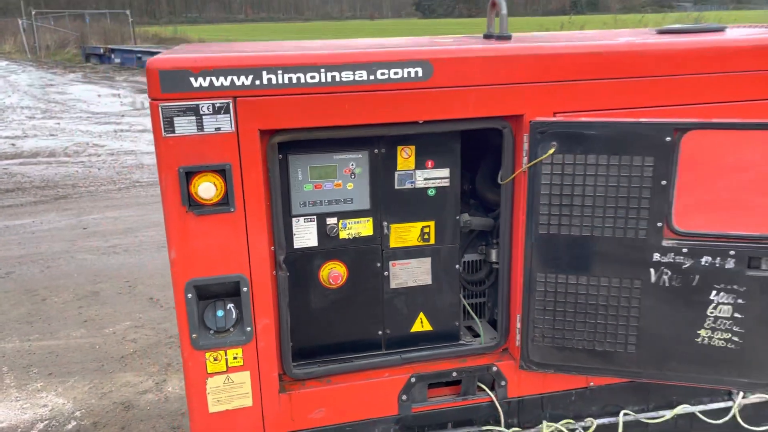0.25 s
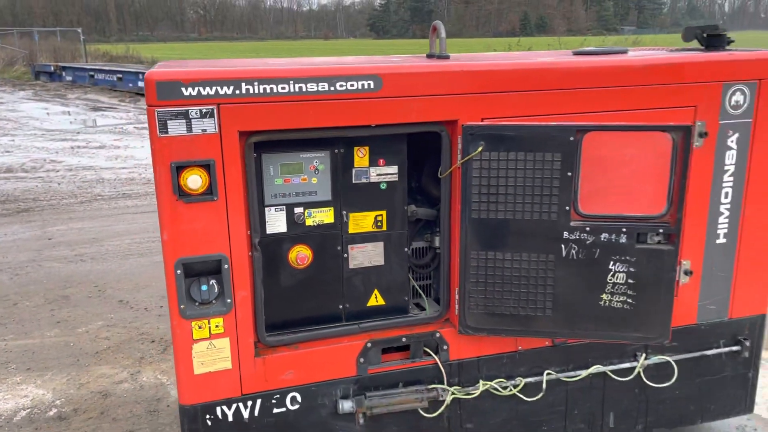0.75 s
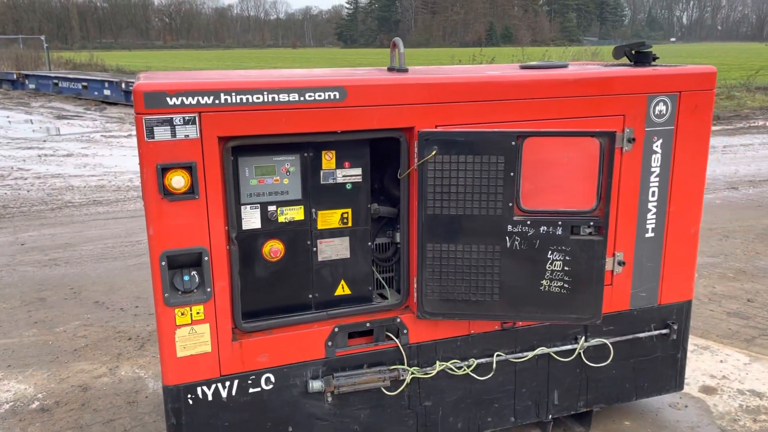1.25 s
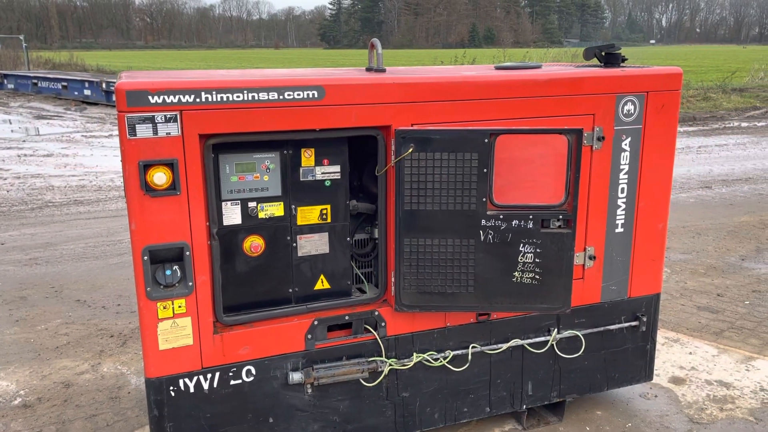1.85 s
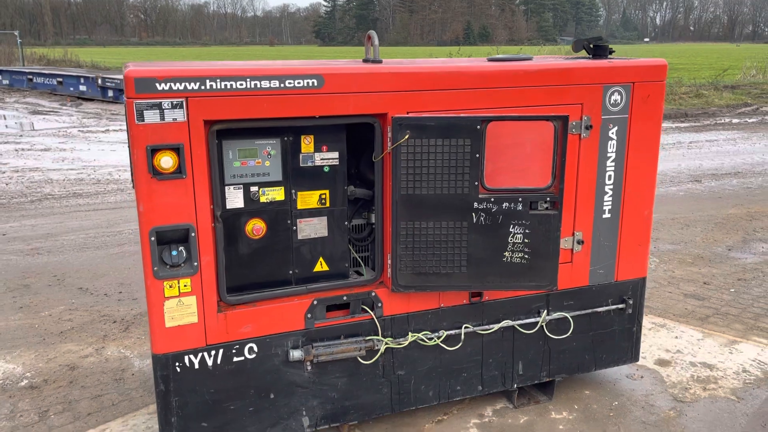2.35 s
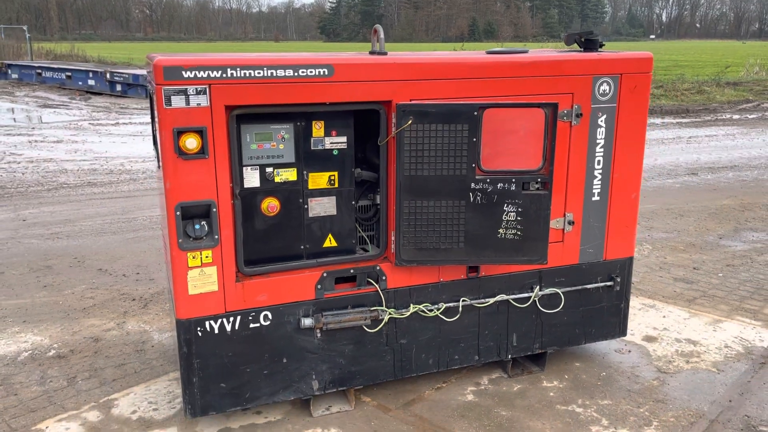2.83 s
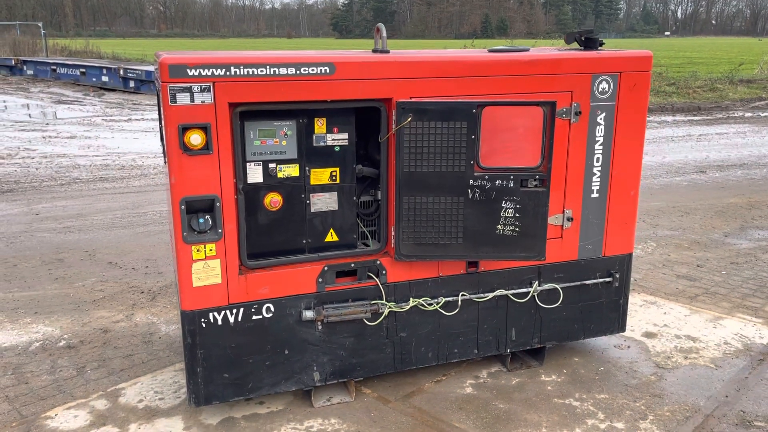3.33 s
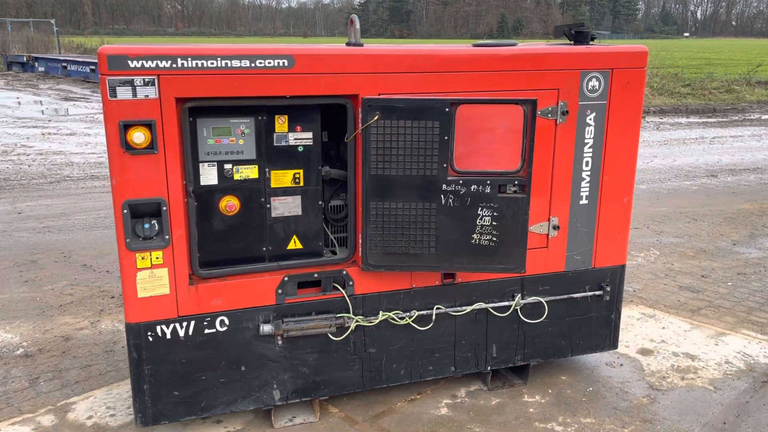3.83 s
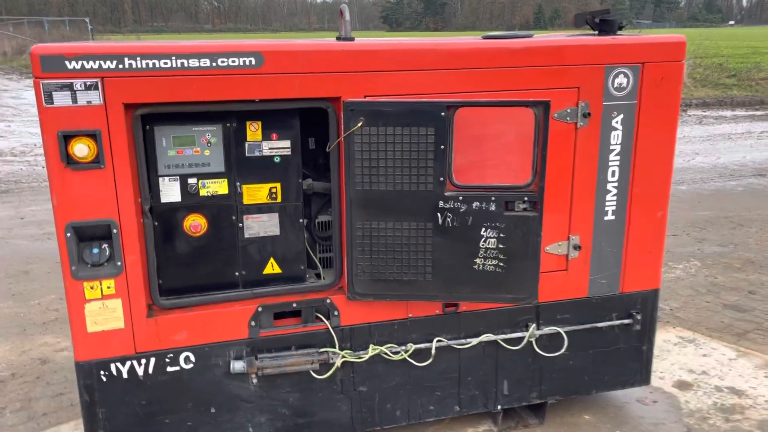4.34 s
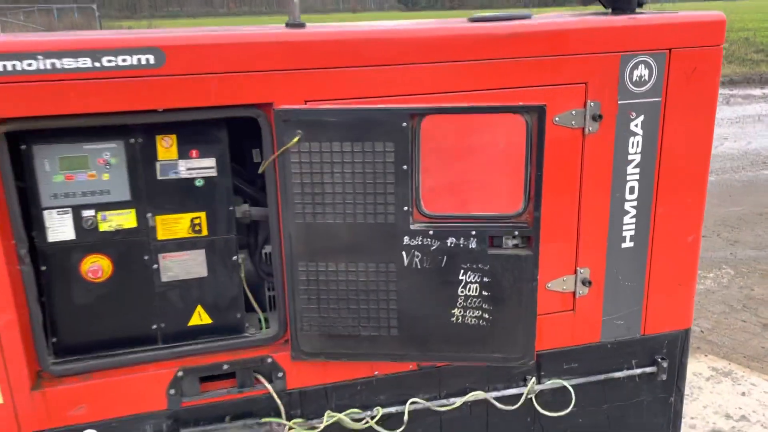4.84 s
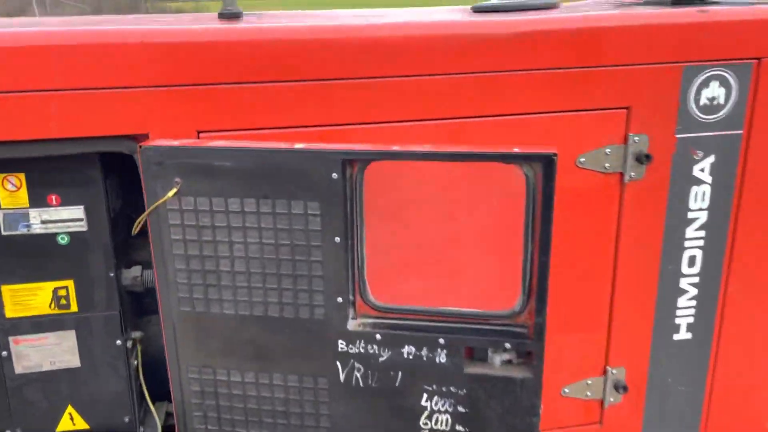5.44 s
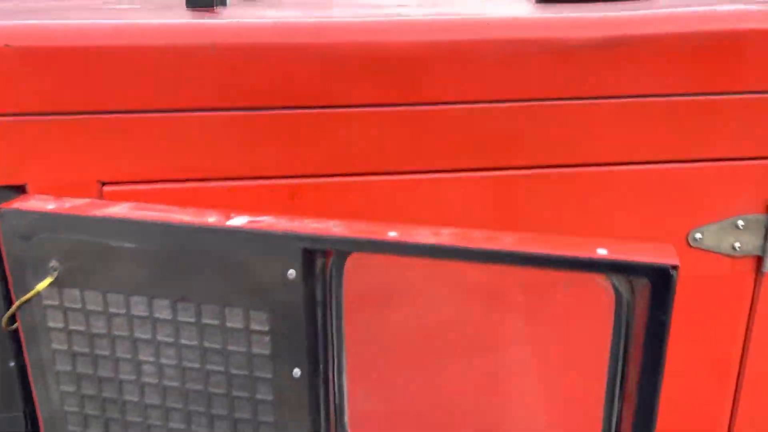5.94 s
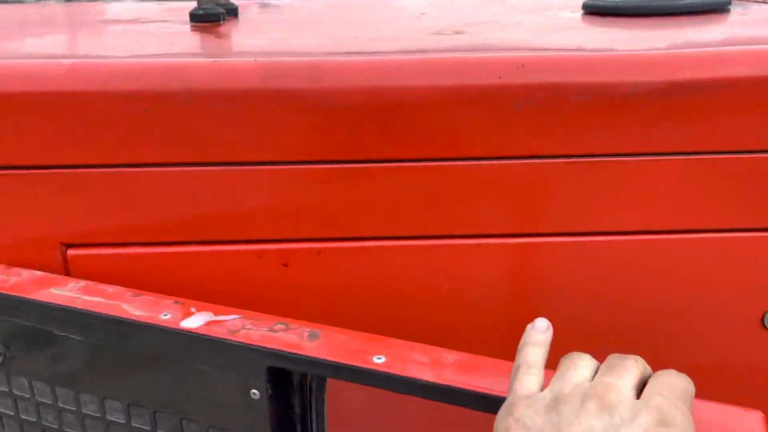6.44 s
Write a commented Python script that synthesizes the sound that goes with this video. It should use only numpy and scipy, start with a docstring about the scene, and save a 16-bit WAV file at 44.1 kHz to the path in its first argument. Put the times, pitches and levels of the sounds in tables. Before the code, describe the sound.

A diesel generator is running from the first instant, with no start or stop: a hard, dense metallic clatter at about 53 firings a second, with an uneven pattern repeating about 13 times a second. Ringing engine-block tones around 1.7 kHz dominate, over a low hum, canopy rumble, thin gear whine and hiss reaching about 10 kHz. From 0 to 2 seconds the knock and clatter surge about three times a second, slowing and fading into a steady run. Bass thins as the handheld stereo microphone backs away, staying leaner until about 4 seconds, with small wind puffs, clustered near 2.6. From 4.3 the microphone moves in: hum and drone grow, tone colour shifts and the image widens. Between 5.0 and 6.0 faint high injector pings tick regularly. Wind thumps around 4.3 to 5.4, then buffets hardest from 6.3 to the end, while the engine continues.

```python
"""Diesel generator in a windy yard

A four-cylinder diesel runs in its steel canopy; its speed hunts at first, then settles.
Engine-cycle tones, rung block modes, gated noise, panel rings and gear whine make the engine.
The listener backs away, then walks up close: bass grows, colour and stereo image turn.
Gusts of low noise buffet the two microphone ports."""
import sys
import numpy as np
from scipy import signal
from scipy.io import wavfile
from scipy.ndimage import uniform_filter1d

SR = 44100
rng = np.random.default_rng(int(sys.argv[2]) if len(sys.argv) > 2 else 0)


def materialize(psi):
    """Save the field psi as 16-bit PCM at rate SR to the path in sys.argv[1].

    A 1-D psi becomes a single channel; in a 2-D psi each row is a channel.
    """
    bounded = np.clip(np.atleast_2d(psi).T, -1, 1)
    quanta = np.round(bounded * 32767).astype(np.int16)
    wavfile.write(sys.argv[1], SR, quanta)


N = 294588
CYCLE_HZ = 13.325  # one four-stroke cycle: four firings
FRAME = 64  # samples per step of slow drift

# relative bass levels: start_s, hum_db, rumble_db
BASS = [(0, -22, -20.5), (.5, -19.5, -24), (.8, -27.5, -19.5), (1.12, -32.5, -32.5), (1.5, -33, -29),
        (1.88, -37, -33), (2.08, -21.5, -23), (2.25, -35, -28.5), (2.5, -26, -26), (2.85, -34, -35),
        (3.1, -33.5, -32.5), (3.46, -24, -27), (4.28, -18.5, -20), (4.65, -29, -23), (4.98, -24, -26.5),
        (5.22, -16.5, -17), (6.2, -17.5, -19), (6.68, -16, -14.5)]
# listener: start_s, closeness to canopy (0-1), lean over door (0-1), share of port phase (0-1)
WALK = [(0, 0, 0, 0.081), (.6, 0.08, 0.12, 0.53), (1.2, 0.14, 0.07, 1.0), (4.2, 0.04, 0, 1.0),
        (4.45, 0.16, 0.23, 1.0), (4.7, 0.59, 0, 1.0), (5.3, 0.67, 0.28, 1.0), (5.6, 0.7, 0.43, 1.0),
        (5.8, 0.77, 0.34, 1.0), (6.05, 0.74, 0.58, 0.98), (6.68, 0.71, 0.7, 0.99)]


def amp(db):
    """Decibels to amplitude."""
    return 10 ** (np.asarray(db) / 20)


def evened(x):
    """Scale to rms 1."""
    return x / np.sqrt(np.mean(x ** 2) + 1e-20)


def read(points, hz):
    """Spectrum table at frequencies hz, straight on a log axis."""
    f, value = np.transpose(points)
    return np.interp(np.log(hz + 1), np.log(f + 1), value)


def curves(rows, t):
    """Every column of a table at times t."""
    s, *columns = np.transpose(rows)
    return [np.interp(t, s, c) for c in columns]


def band(x, lo_hz, hi_hz):
    """Band-pass, rms 1."""
    sos = signal.butter(3, [lo_hz, hi_hz], "bandpass", fs=SR, output="sos")
    return evened(signal.sosfilt(sos, x))


def ring(x, hz, width_hz):
    """One mode of the engine block: a two-pole resonator."""
    r = np.exp(-np.pi * width_hz / SR)
    turn = 2 * np.pi * hz / SR
    return signal.lfilter([np.sin(turn)], [1, -2 * r * np.cos(turn), r * r], x)


def slow(count, span):
    """Rows of slowly drifting chance, jointly rms 1, one value a frame."""
    noise = rng.standard_normal((count, N // FRAME + 1))
    return evened(uniform_filter1d(uniform_filter1d(noise, span, axis=1), span, axis=1))


def at_times(row, t):
    """A slow row read at times t."""
    return np.interp(t * SR / FRAME, np.arange(N // FRAME + 1), row)


def tones(orders, cycle, waver_db, spread):
    """Wavering multiples of the engine cycle; a small phase spread bunches them into one throb a cycle."""
    cycle = cycle[::8]  # low enough for an eighth of the rate
    waver = amp(waver_db * slow(count=len(orders), span=40))
    waver = np.repeat(waver, 8, axis=1)[:, :len(cycle)]
    low = sum(amp(db) * w * np.cos(2 * np.pi * (k * cycle + spread * rng.random()))
              for (k, db), w in zip(orders, waver))
    return evened(signal.resample_poly(low, 8, 1)[:N])


def wind(t):
    """Lumps of turbulent low noise around each buffet's pitch, partly unlike in the two ports."""
    # buffets: start_s, relative level_db, pitch_hz, length_s
    gusts = [(0.19, -19.5, 250, 0.045), (0.488, -10, 388, 0.012), (0.328, -13, 114, 0.057),
             (0.735, -7, 128, 0.037), (1.036, -15, 384, 0.048), (1.499, -14, 334, 0.014),
             (2.209, -14, 390, 0.022), (2.519, -8.5, 280, 0.025), (2.548, -12.5, 420, 0.027),
             (2.606, -13, 537, 0.017), (2.636, -11.5, 480, 0.028), (2.72, -22, 282, 0.021),
             (2.964, -20, 290, 0.014), (3.136, -20, 280, 0.013), (3.434, -16, 282.7, 0.008),
             (4.24, -10, 117, 0.11), (4.308, -8.5, 238, 0.016), (4.583, -8.5, 179, 0.019),
             (4.805, -8.5, 357, 0.021), (5.203, -13.5, 265, 0.038), (5.227, -7.5, 258, 0.015),
             (5.329, -10.5, 300, 0.016), (5.441, -6.5, 115, 0.071), (6.238, -11, 364, 0.047),
             (6.358, 2, 113, 0.014), (6.394, -6.5, 245, 0.012), (6.482, -3.5, 111, 0.024),
             (6.55, -6, 222, 0.016), (6.589, -5.5, 290, 0.014), (6.651, -1.5, 365, 0.032)]
    out = np.zeros((2, N))
    for s, db, hz, length_s in gusts:
        at = slice(round((s - .05) * SR), round((s + .15) * SR))
        shared, own = (band(rng.standard_normal(8820), hz * 0.32, hz * 1.35) for _ in range(2))
        u = (t[at] - s) / length_s
        steepness = np.where(u < .3, 9.0, 1.8)  # rises faster than it falls
        shape = amp(db - 6.0) * np.exp(-steepness * (u - .3) ** 2)
        out[:, at] += shape * (shared + np.array([[.4], [-.4]]) * own)[:, :len(u)]
    flutter = np.array([band(rng.standard_normal(N), 60, 380) for _ in range(2)])
    flutter *= amp(5 * at_times(slow(count=1, span=14)[0], t))  # choppy
    return out + amp(curves(BASS, t)[1] - 14.0) * flutter


def hunt(t):
    """Governor hunting: fuel surges that slow down and die away."""
    # start_s, strength of the swing (ratio)
    surges = [(0, 1.13), (.19, 1.1), (.54, 0.73), (.9, 0.98), (1.3, 0.44), (1.7, .45), (2.1, 0.12), (3, 0)]
    surge_s, hunt_hz, sag_hz_per_s = .19, 2.9, .41
    u = t - surge_s
    swings = hunt_hz * u - .5 * sag_hz_per_s * np.minimum(u, 3) ** 2
    return curves(surges, t)[0] * np.cos(2 * np.pi * swings)


def load(t):
    """Drone, knock, clatter and hiss levels in dB, swinging with the governor."""
    # relative levels: start_s, drone_db, knock_db, clatter_db, hiss_db
    levels = [(0, -32, -30.5, -40, -44), (1, -31.5, -32, -40.5, -43.5), (2, -33.5, -31, -40.5, -43),
              (2.5, -34, -31, -40, -43), (2.88, -35.5, -30.5, -39.5, -43),
              (3.499, -31.5, -29.5, -40, -43.5), (4.3, -30, -30.5, -41, -41.5),
              (5, -27.5, -30.5, -37.5, -41.5), (5.7, -28.5, -30.5, -37, -39), (6.15, -29, -31, -41, -42.5),
              (6.68, -27.5, -31, -39.5, -39.5)]
    # swing at hunt strength 1: drone, knock, clatter, hiss [dB]
    hunt_db = [0.27, 4.9, 2.9, 3.2]
    return [db + swing_db * hunt(t) for db, swing_db in zip(curves(levels, t), hunt_db)]


def bass(t):
    """Hum and rumble levels in dB, with brief hum dips and random waver."""
    # hum dips: centre_s, depth_db, half_width_s
    dips = [(.35, -18, 0.023), (2.62, -9, 0.033), (4.39, -13, 0.089), (4.91, -26, 0.018), (6.43, -9, 0.11)]
    # rms random waver: hum, rumble [dB]
    waver_db = [.7, 1.0]
    hum_db, rumble_db = curves(BASS, t)
    hum_db = hum_db + sum(db * np.exp(-((t - s) / half_s) ** 2) for s, db, half_s in dips)
    rows = slow(count=2, span=30)
    return [db + w_db * at_times(row, t) for db, w_db, row in zip((hum_db, rumble_db), waver_db, rows)]


def firings(cycle):
    """Firing count, cylinder index, and seconds since it lit."""
    turn = 4 * cycle + 4.27
    count = np.floor(turn).astype(int)
    return count, (count - 1) % 4, turn % 1 / (4 * CYCLE_HZ)


def whine(t, cycle):
    """Timing gears: the tooth tone and its neighbours, as multiples of the cycle."""
    # cycle multiple, relative level_db
    orders = [(127, -1.5), (128, -0.5), (131, -3), (140, 0.5), (144, -8), (148, -5.5)]
    # start_s, relative level_db
    whine_levels = [(0.0, -61), (0.115, -51), (0.14, -25), (0.4, -49), (0.53, -29), (0.75, -40), (0.9, -30),
                    (1.1, -36.5), (1.34, -37), (1.4, -48), (2.68, -30), (3.36, -32), (3.46, -28.5),
                    (4.5, -36), (4.8, -45), (4.91, -37), (5.39, -43), (5.46, -38), (5.81, -44),
                    (5.84, -38.5), (6.6, -36.5)]
    return amp(curves(whine_levels, t)[0] - 1.0) * tones(orders, cycle, 2.0, 0.94)


def ping():
    """An injector rings briefly as the listener passes: damped tones, each with a dry noise snap."""
    # start_s, relative level_db, pitch_hz
    pings = [(5.0328, -39, 4600), (5.1066, -33, 4600), (5.1829, -29, 4380), (5.2567, -35, 4330),
             (5.3321, -30.5, 4360), (5.4067, -32, 4310), (5.48, -29, 4300), (5.5562, -43, 4140),
             (5.6304, -24, 4240), (5.7052, -32, 4240), (5.7801, -27, 4240), (5.8549, -31, 4260),
             (5.9312, -34, 4280), (6.0055, -48, 4200)]
    width_hz, snap_db, snap_s = 50, -6, 0.005
    out, u = np.zeros(N), np.arange(1500) / SR
    for (s, db, hz), noise in zip(pings, rng.standard_normal((len(pings), 1500))):
        swell = np.minimum(u / .002, 1)
        tone = swell * np.exp(-np.pi * width_hz * u) * np.sin(2 * np.pi * hz * u)
        snap = amp(snap_db) * np.exp(-u / snap_s) * band(noise, 2800, 6900)
        out[round(s * SR):][:1500] += amp(db + 1.5) * (tone + snap)
    return out


def panel(t, cycle):
    """Cylinder one's blow rings a canopy panel once a cycle, on a resonance that slides with the angle."""
    # start_s, pitch_hz, relative level_db
    resonance = [(0, 1033, -26.5), (1.2, 1120, -32.5), (2.5, 1046, -35), (4.2, 990, -33.5),
                 (4.5, 1103, -27.5), (4.9, 1050, -28), (5.3, 1027, -27), (5.8, 1045, -27.5),
                 (6.1, 1040, -35.5), (6.68, 1030, -29)]
    width_hz, lag_cycles = 60, 0.018
    count, cylinder, _ = firings(cycle - lag_cycles)
    hz, db = curves(resonance, t)
    lit = (np.diff(count, prepend=count[0]) > 0) * (cylinder == 0)
    tap = lit * amp(db + 3.4 * hunt(t) + 0.78 * rng.standard_normal(400)[count])
    turn, r = np.exp(2j * np.pi * np.cumsum(hz) / SR), np.exp(-np.pi * width_hz / SR)
    soft = signal.lfilter([.02], [1, -.98], tap / turn)  # swells for about a millisecond
    return (turn * signal.lfilter([1], [1, -r], soft)).real * 2.4  # the swell costs the peak


def clatter(t, cycle):
    """Valve and injector noise flaring at every firing over the fan's rush; its top puffs more evenly."""
    # below the split, per cylinder [dB]
    clatter_cyl_db = [-3, -2.5, -1.5, 5]
    # above the split, per cylinder [dB]
    hiss_cyl_db = [0, 0, 1.5, 0]
    # extra clatter in a surge of strength 1, per cylinder [dB]
    surge_cyl_db = [5.6, 7.9, 10, 2.8]
    split_hz = 5800
    count, cylinder, since = firings(cycle)
    chance = amp(2.4 * rng.standard_normal((2, 400)))[:, count]
    flare, puff = amp([clatter_cyl_db, hiss_cyl_db])[:, cylinder] * chance
    flare = flare * amp(np.array(surge_cyl_db)[cylinder] * np.maximum(hunt(t), 0))
    # much of the noise returns every cycle, changing slowly
    one, other = rng.standard_normal((2, 4, 900))[:, cylinder, (since * SR).astype(int)]
    rush = rng.standard_normal(N) + 1.1 * (one * np.cos(1.5 * t) + other * np.sin(1.5 * t))
    flare_shape = np.minimum(since / 0.0025, 1) * np.exp(-since / 0.011)
    puff_shape = np.minimum(since / 0.00078, 1) * np.exp(-since / 0.019)
    low = evened((0.95 + 0.79 * flare * flare_shape) * rush)
    top = evened((0.6 + 1.65 * puff * puff_shape) * rush)
    split = signal.butter(4, split_hz, fs=SR, output="sos")
    return top + signal.sosfiltfilt(split, low - top)


def coloured(x):
    """Filter by a broad colour that moves with the walk; its bands follow drone, knock, clatter and hiss."""
    # colour from afar: pitch_hz, relative density_db
    far = [(150, -53), (250, -4), (341, -17), (458, -16), (879, -4), (1060, 1), (1580, 6), (1710, -20),
           (1910, 5), (2300, -22.5), (2900, -18), (6810, -25), (8870, -14.5), (9740, -20.5), (10200, -33),
           (13300, -57), (22000, -120)]
    # colour up close: pitch_hz, relative density_db
    near = [(150, -19.5), (250, 10.5), (374, -15), (430, -22.5), (921, -1.5), (1040, -4), (1360, 8),
            (1660, 0.5), (2340, -19), (3840, -34), (4410, -33), (7030, -27.5), (9010, -20.5), (9740, -29.5),
            (10200, -85), (13300, -100), (22000, -120)]
    # colour leaning over the door: pitch_hz, relative density_db
    over = [(150, -40), (250, 9), (398, -2), (543, -2), (865, -21), (1010, -8.5), (1360, -50),
            (1690, -35.5), (2100, -5.5), (2690, -44), (3440, -23.5), (6110, -31.5), (8870, -21),
            (9740, -24.5), (10200, -55.5), (13300, -68), (22000, -120)]
    hz, t, z = signal.stft(x, SR, nperseg=512, noverlap=384)
    close, lean, _ = curves(WALK, t)
    near_db = (1 - lean) * read(near, hz)[:, None] + lean * read(over, hz)[:, None]
    colour_db = (1 - close) * read(far, hz)[:, None] + close * near_db
    edges_hz = [(400, 900), (950, 1950), (2400, 5600), (7000, 9800)]
    power = [amp(2 * colour_db[(hz > lo) & (hz < hi)]).sum(0) / 256 for lo, hi in edges_hz]
    trim_db = [[-3.0], [-8.5], [-.3], [.2]]  # tones and modes carry the rest
    swing_db = np.array(load(t)) - 10 * np.log10(power) + trim_db
    share = np.array([np.interp(hz, [700, 1000, 1900, 2500, 5600, 7000], row)
                      for row in np.repeat(np.eye(4), [1, 2, 2, 1], axis=1)])
    return signal.istft(z * amp(colour_db + share.T @ swing_db), SR, nperseg=512, noverlap=384)[1][:N]


def knock(t, cycle):
    """Each firing's sudden pressure rise strikes the block modes, with a short ragged after-burn."""
    # modes: pitch_hz, width_hz, blow_db of cylinders 1-4, gear_db, change close_db, further change over door_db
    block = [(754, 320, -32, -7, -27, -18, 2.5, 9.5, -0.5),
             (1036, 44, -32.5, -17, -9, -29.5, -8.5, 13.5, -4),
             (1165.5, 102, -30.5, -20, -10.5, -27, 11, 0.5, -3),
             (1295, 285, -32, -26, -3, -10.5, -16, -7, -14), (1545, 224, -16, -17, 3, -16, -21, -4.5, -19),
             (1666, 59, -17.5, -17.5, -12.5, -15, -16, -2, 23),
             (1698, 55, -1.5, -0.5, 2.5, 0, 0.5, -14.5, 0.5),
             (1874, 74, -6.5, -5.5, -6.5, 1.5, 6.5, -17, 3),
             (2087, 280, -30.5, -38, -18, -29, 3.5, 9.5, 5.5),
             (3000, 190, -25, -15.5, -20, -17.5, -1.5, -8.5, 1),
             (3420, 550, -28, -22, -42, -27, -1, -8, 15),
             (4450, 660, -28, -27.5, -21, -12.5, -20, -14, -10.5)]
    # delay of the drive to each mode [ms]
    lag_ms = [-1, 0.5, -1.5, 0.5, 2, 1, 2.5, 1, 3, 4, 2.5, 2]
    uneven_db_per_khz = 1.0  # the higher a mode, the more its blows differ
    scatter_cycles = .00015 * at_times(slow(count=1, span=8)[0], t)
    count, cylinder, since = firings(cycle + scatter_cycles)
    strike = 12.0 * (np.diff(count, prepend=count[0]) > 0)
    ragged = .3 * rng.standard_normal((4, 900))[cylinder, (since * SR).astype(int)]
    after = (ragged + .12 * rng.standard_normal(N)) * np.exp(-since / .003)
    blow = (strike + after) * amp(.8 * rng.standard_normal(400))[count]  # nearly even firings
    mesh = rng.standard_normal(3400)[(cycle % 1 * 3309).astype(int)]  # teeth meet alike every cycle
    gears = amp(-21.0) * (.45 * mesh + .3 * rng.standard_normal(N)) * amp(-5 * hunt(t))
    # the high modes hear the valve gear instead of the blow
    rattle = 1.3 * amp(4 * hunt(t)) * rng.standard_normal(N) * np.exp(-since / .008)
    close, lean, _ = curves(WALK, t)
    modes = np.zeros(N)
    for k, (hz, width_hz, *cyl_db, gear_db, near_db, over_db) in enumerate(block):
        uneven_db = uneven_db_per_khz * hz / 1000 * np.clip(rng.standard_normal(400), -2, 1.5)
        hit = amp(cyl_db)[cylinder] * amp(uneven_db)[count] * (blow if hz < 2500 else rattle)
        drive = hit + amp(gear_db) * gears  # the gear train keeps it ringing
        drive = np.roll(drive, round(lag_ms[k] * SR / 1000))
        drive = ring(drive, hz, 4 * width_hz) * 8 * np.pi * width_hz / SR  # swells, does not click
        place = amp(near_db * close + over_db * lean)
        modes += (-1) ** k * np.sqrt(width_hz) * place * ring(drive, hz, width_hz)
    levelled = modes / np.sqrt(uniform_filter1d(modes ** 2, 30000))
    return amp(load(t)[1] - 0.44) * levelled


def exhaust(t, cycle):
    """Firing tone, lower orders that shake the canopy, and block drone: multiples of the cycle plus noise."""
    # canopy rumble: cycle multiple, relative level_db
    rumble_orders = [(6, 0), (7, -7), (8, -4), (9, -14), (10, 0), (11, -12), (12, 0.5), (13, -1.5),
                     (14, -5.5), (16, -7), (18, -14), (20, -12.5), (22, -13), (24, -21.5), (27, -13.5)]
    # block drone: cycle multiple, relative level_db
    drone_orders = [(29, -13.5), (33, -10.5), (34, -11.5), (35, -11.5), (38, -11), (42, -10), (44, -16),
                    (46, -11), (50, -14.5), (54, -17.5), (62, -26.5)]
    # strongest drone tones, trading places as the listener moves: start_s, relative level_db of multiples 32, 36, 40
    drone_lines = [(0.0, -48, -55, -59), (0.13, -36, -40, -49), (0.35, -43, -48, -44),
                   (0.46, -41.5, -43, -44.5), (2.02, -45, -42, -46), (2.54, -40.5, -43, -38),
                   (2.77, -50.5, -51, -60), (3.38, -46, -38.5, -43), (4.83, -35, -38, -43.5),
                   (5.29, -36, -44, -43), (5.84, -38.5, -35.5, -39.5), (6.6, -38.5, -38, -36.5)]
    hum_db, rumble_db = bass(t)
    firing_tone = np.sqrt(2) * np.cos(2 * np.pi * (4 * cycle + 0.34))
    hum = firing_tone + amp(-7.5) * band(rng.standard_normal(N), 52.0, 73.4)
    rumble = amp(-0.98) * tones(rumble_orders, cycle - .8, 1.4, .45)
    rumble = rumble + amp(-8.5) * band(rng.standard_normal(N), 51.4, 210)
    drone = tones(drone_orders, cycle - .05, 1.5, 0.86)
    lines = sum(amp(db) * np.cos(2 * np.pi * (k * cycle + rng.random()))
                for k, db in zip((32, 36, 40), curves(drone_lines, t)))
    low = amp(hum_db) * hum + amp(rumble_db) * rumble
    return low + amp(load(t)[0] - 4.5) * drone + amp(5.5) * lines


def ports(x):
    """Two microphone ports: phase lead and balance per frequency, and a diffuse share of opposite sign."""
    # left-right likeness: pitch_hz, likeness (0-1)
    same = [(60, .975), (300, .96), (600, .85), (1200, .85), (2600, .74), (5600, .66), (9000, .84)]
    # balance: pitch_hz, left minus right_db
    left = [(60, 1.7), (150, 0), (350, 0), (850, -0.5), (2050, 1.5), (4970, 3), (12000, -0.5)]
    # left port's lead from afar: pitch_hz, lead_rad
    far_phase = [(100, 0), (500, .05), (1100, .2), (1800, .6), (3000, .95), (4500, 1.35), (6500, .2),
                 (7500, 1.7), (8700, -.3), (9300, -1.6), (9900, -2.4)]
    # left port's lead up close: pitch_hz, lead_rad
    near_phase = [(100, .05), (500, .35), (1100, 1.2), (1700, 2.3), (2300, 1.5), (3000, 1.1), (4500, .4),
                  (6500, .2), (7500, .9), (8700, -.7), (9900, -2.2)]
    hz, t, z = signal.stft(x, SR, nperseg=1024, noverlap=768)
    close, _, turn = curves(WALK, t)
    lead = turn * ((1 - close) * read(far_phase, hz)[:, None] + close * read(near_phase, hz)[:, None])
    unlike = np.clip((1 - read(same, hz)[:, None]) * (1 + .5 * close), 0, 1)  # wider up close
    chance_phase = np.exp(2j * np.pi * rng.random(z.shape[::-1]).T)
    diffuse = 0.81 * np.sqrt(unlike) * chance_phase  # thrown back by the yard
    tilt = amp(read(left, hz)[:, None] / 2) * np.exp(.5j * lead)
    z /= np.cos(lead / 2)  # levels count for the sum of the ports
    pair = np.array([z * (tilt + diffuse), z * (1 / tilt - diffuse)])
    return signal.istft(pair, SR, nperseg=1024, noverlap=768)[1][:, :N]


def scene():
    """The engine, delayed by a changing sound path, heard through the ports with the wind."""
    # relative sound path: start_s, length_m
    path = [(0, -0.5), (.5, 1.13), (1, 1.6), (1.5, 1.07), (2, 2), (2.66, 2.5), (3.65, 3), (4.31, 3),
            (4.64, 2.5), (4.97, 3.0), (5.63, 2), (6.29, 2), (6.68, 2.5)]
    sound_m_per_s = 343
    hunt_lead_cycles, hunt_lag_s = .012, .17  # swing of the crank, trailing the fuel
    wobble_cycles = .0018  # the crank runs ahead and behind within each cycle
    t = np.arange(N) / SR
    cycle = CYCLE_HZ * (t - curves(path, t)[0] / sound_m_per_s)
    cycle = cycle + hunt_lead_cycles * hunt(t - hunt_lag_s)
    cycle = cycle + wobble_cycles * np.sin(2 * np.pi * (cycle + .3))
    engine = exhaust(t, cycle) + knock(t, cycle) + ping() + panel(t, cycle) + whine(t, cycle)
    return ports(engine + coloured(clatter(t, cycle))) + wind(t)


def record(dry):
    """Round off the loudest peaks, then limit the band."""
    edge_hz = 10050
    rounded = np.pad(1.1 * np.tanh(dry / 1.1), ((0, 0), (255, 255)), "reflect")
    low_pass = signal.firwin(511, edge_hz, window=("kaiser", 9), fs=SR)
    return signal.oaconvolve(rounded, low_pass[None], "valid")


dry = scene()
out = record(dry)
materialize(out)
```